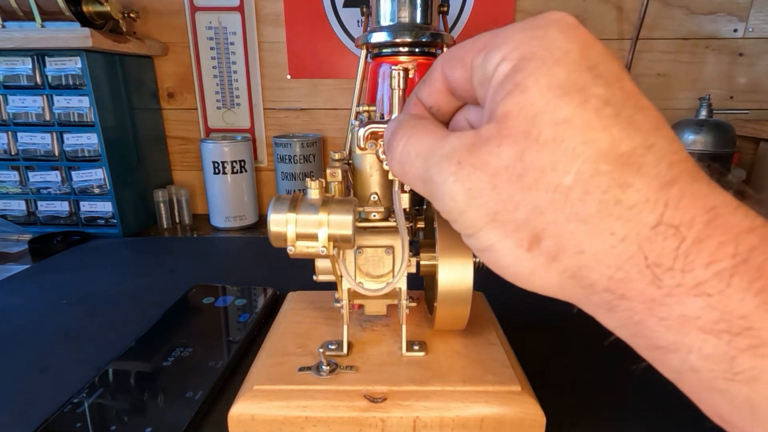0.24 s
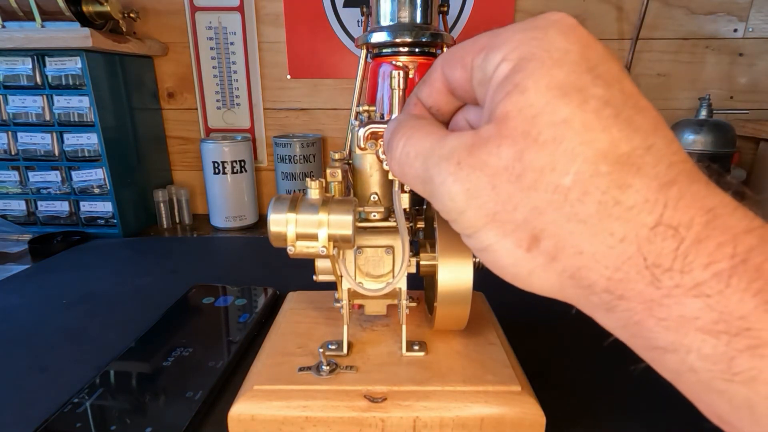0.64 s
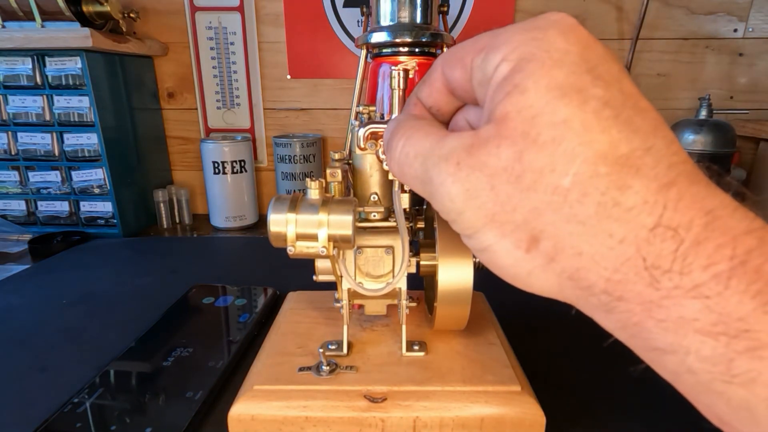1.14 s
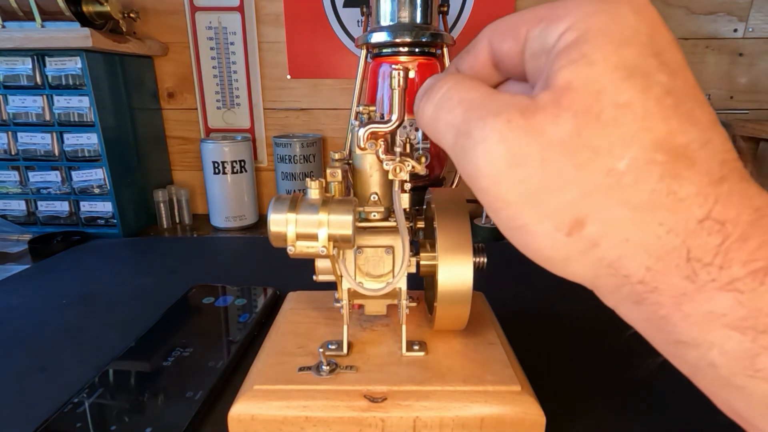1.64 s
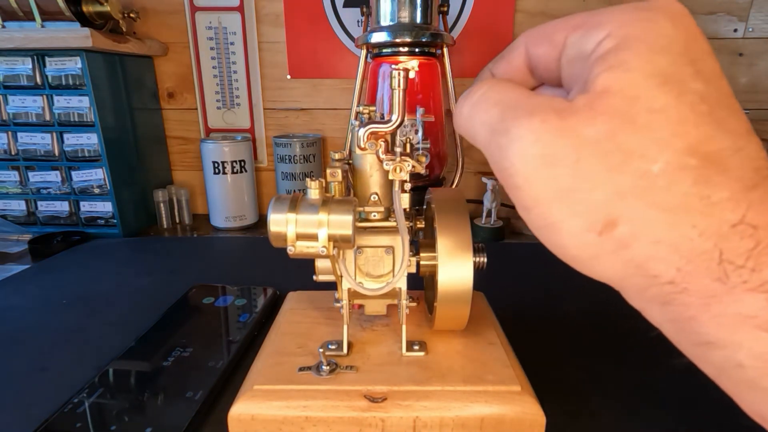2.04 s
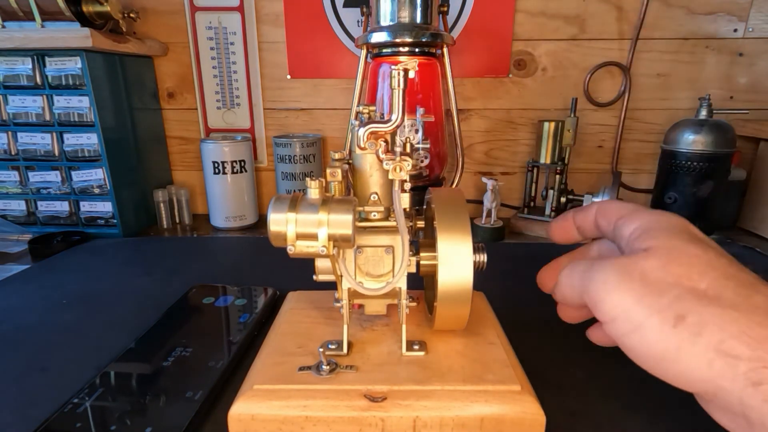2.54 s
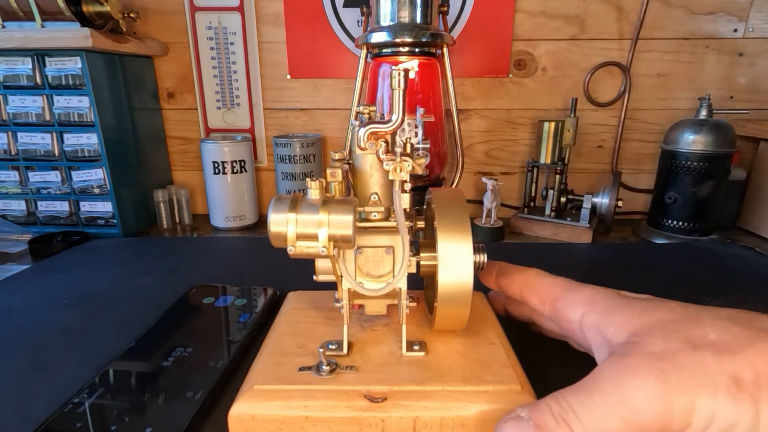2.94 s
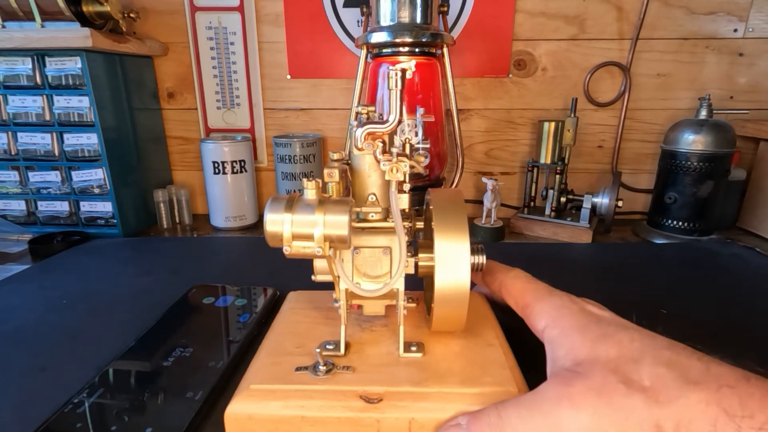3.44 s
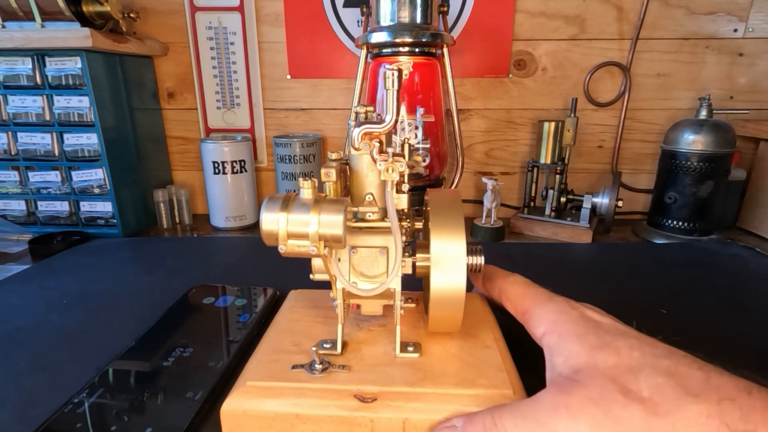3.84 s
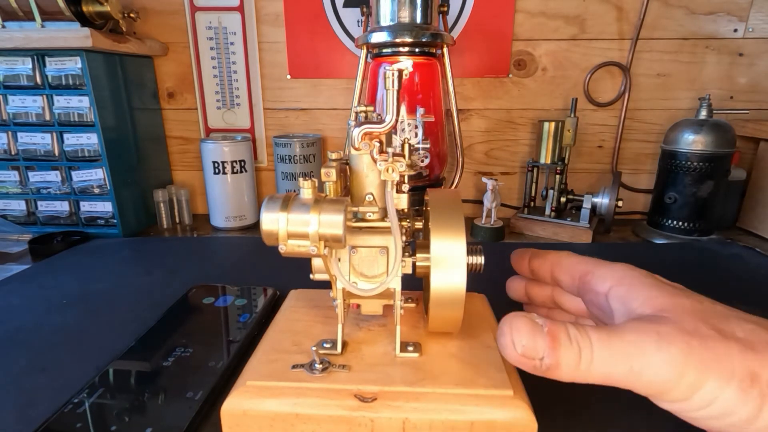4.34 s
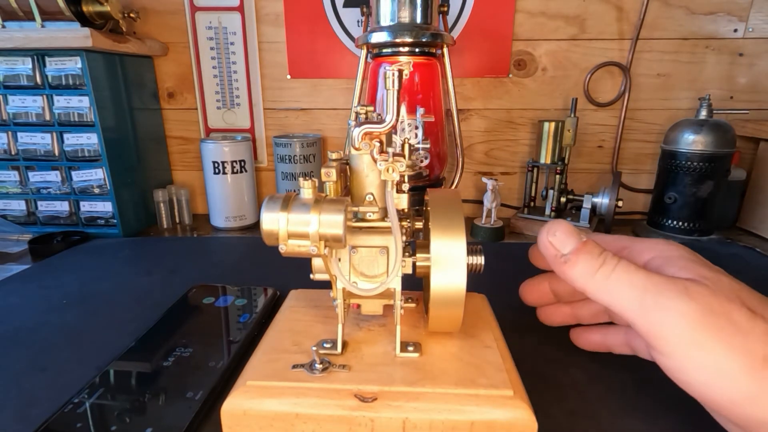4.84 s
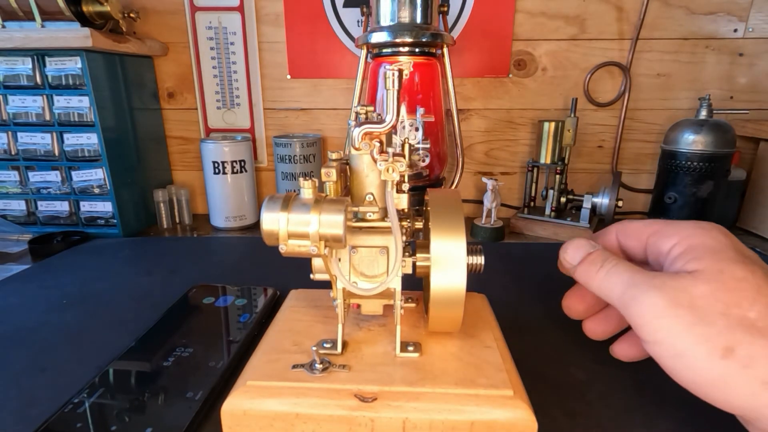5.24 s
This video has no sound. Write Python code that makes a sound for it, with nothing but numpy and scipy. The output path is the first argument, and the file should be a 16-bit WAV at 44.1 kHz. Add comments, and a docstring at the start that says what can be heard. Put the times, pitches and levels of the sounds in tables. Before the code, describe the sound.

Close up, a tiny one-cylinder engine pops rapidly for a second, then wheezes and clicks along, firing only now and then.

```python
"""Soft puffs and clinks, then sharp pops: a small hit-and-miss engine on a wooden base in a workshop.
At first it fires every other cycle: bursts of noise ring the muffler, and smooth pushes ring the pipe and
the base. Once it is up to speed the governor holds the exhaust valve open and the piston pumps air: shaped
noise hisses and roars, and a slow pressure pulse throbs with the crank. Then the latch drops (ringing
tones), the intake valve snorts (noise in quick gulps) and it pops again, close to a stereo microphone."""
import sys
import numpy as np
from scipy import signal
from scipy.fft import rfft, irfft, next_fast_len
from scipy.io import wavfile
from scipy.ndimage import uniform_filter1d, map_coordinates

SR = 44100
rng = np.random.default_rng(int(sys.argv[2]) if len(sys.argv) > 2 else 0)


def wrap_up_sound(samples):
    """Save the sound to the file named by the first command line argument, as 16-bit audio."""
    columns = np.atleast_2d(samples).T
    # keep every value between -1 and 1, then stretch to whole-number steps
    tamed = np.clip(columns, -1, 1)
    steps = np.round(tamed * 32767).astype(np.int16)
    wavfile.write(sys.argv[1], SR, steps)


def volts_from_decibels(level):
    """Turn decibel levels (scalar or array-like) into linear amplitude factors."""
    exponent = np.asarray(level, float) / 20
    return 10 ** exponent


N = 241917
TIME = np.arange(N) / SR


def unit(x):
    """Brings a sound to rms 1."""
    return x / np.sqrt(np.mean(x ** 2) + 1e-20)


def along(points, hz):
    """Reads a curve of (frequency [Hz], value) points on a log frequency axis."""
    f, v = np.transpose(points)
    return np.interp(np.log(hz + 1), np.log(f + 1), v)


def wobble(rate):
    """A smooth random curve with this many random points a second."""
    return map_coordinates(rng.standard_normal(int(N * rate / SR) + 4), [TIME * rate])


def noise():
    """Plain white noise, as long as the scene."""
    return rng.standard_normal(N)


def filtered(x, response):
    """Multiplies the spectrum of x by a complex response of frequency."""
    m = next_fast_len(N + SR // 2)
    return irfft(rfft(x, m) * response(np.fft.rfftfreq(m, 1 / SR)), m)[..., :N]


def resonances(modes):
    """Response of things that ring when struck: (frequency [Hz], width [Hz], level [dB]), signs alternating."""
    def response(f):
        total = 0
        for k, (centre, width, db) in enumerate(modes):
            damping = 1j * f * width
            total = total + (-1) ** k * volts_from_decibels(db) * damping / (centre * centre - f * f + damping)
        return total
    return response


def coloured(spectrum):
    """Noise of rms 1 with the given spectrum."""
    return unit(filtered(noise(), lambda hz: volts_from_decibels(along(spectrum, hz))))


def swells(times, dbs, rise, fall):
    """An envelope that climbs to each time and dies after it (rise and fall: seconds to change by e)."""
    total = 0
    for s, db in zip(times, dbs):
        total = total + volts_from_decibels(db) * np.exp(np.where(TIME < s, (TIME - s) / rise, (s - TIME) / fall))
    return total


def impulses(times, dbs):
    """One sample of the given level at each time."""
    return np.bincount(np.round(np.asarray(times) * SR).astype(int), volts_from_decibels(dbs), N + SR)[:N]


# noise of gears and shop air: (frequency [Hz], relative level per Hz [dB])
FLOOR = [(25, 13.5), (60, -1), (150, 0.5), (200, -7.5), (600, -27), (1000, 1.5), (2000, -69), (4000, -14),
         (8000, -44), (12000, -23), (15000, -56)]


def gears_and_air():
    """A steady noise of gears and shop air whose level drifts slowly."""
    return volts_from_decibels(-39.0 + 4.7 * wobble(8)) * coloured(FLOOR)


# dull thuds on the bench: (time [s], relative level [dB])
THUDS = [(3.847, -9.5), (4.86, -8)]


def thuds():
    """A soft knock dents the air once."""
    s, db = np.transpose(THUDS)
    dent = uniform_filter1d(swells(s + 0.0056, db + 0.5, rise=0.0018, fall=0.00021), size=50)
    return -filtered(dent, resonances([(70.0, 1100, 0.0042)]))


def openings():
    """Times at which the exhaust valve lets a charge out, as a pop or a puff."""
    return np.sort([row[0] for row in POPS + PUFFS])


USUAL_TURNS_PER_S = 13.7  # cam turns, two crank turns each
OPENING_BEFORE_S, OPENING_AFTER_S = -.057, 5.514  # openings just outside the scene
OPENS_AT_TURN, SAG_TURNS_PER_S2 = .268, 2.6  # cam angle of an opening; slowing between openings


def camshaft():
    """Cam turns: whole turns from opening to opening, fast after each and slowing steadily to the next."""
    s = np.r_[OPENING_BEFORE_S, openings(), OPENING_AFTER_S]
    whole_turns = np.round(np.diff(s) * USUAL_TURNS_PER_S)
    turns = np.r_[0, np.cumsum(whole_turns)] - 1 + OPENS_AT_TURN
    k = np.searchsorted(s, TIME)
    sag = SAG_TURNS_PER_S2 / 2 * (TIME - s[k - 1]) * (s[k] - TIME)
    return np.interp(TIME, s, turns) + sag


SHAKE_GROWS = 1.5  # power of the speed


def shake(cam):
    """How hard the moving parts shake the base: it grows with speed and is 1 at the usual speed."""
    speed = uniform_filter1d(np.gradient(cam) * SR, size=6000, mode="nearest")
    return (speed / USUAL_TURNS_PER_S) ** SHAKE_GROWS


QUIET_AFTER_POP_S, QUIET_AFTER_PUFF_S = 0.025, 0.017  # the pumping returns this long after an opening


def latch_out():
    """1 while the valve follows its cam: from each clink or tick to the next opening and a little beyond."""
    s = openings()
    spans = [(-1, s[0])]
    spans += [(row[0], s[np.searchsorted(s, row[0])]) for row in CLINKS]
    spans += [(row[0], row[0] + QUIET_AFTER_POP_S) for row in POPS]
    spans += [(row[0], row[0] + QUIET_AFTER_PUFF_S) for row in PUFFS]
    inside = np.any([(TIME > a) & (TIME < b) for a, b in spans], axis=0)
    return uniform_filter1d(1.0 * inside, size=500)


# all positions and widths in crank turns
GUSH_START, GUSH_HOLD, GUSH_FADE, LULL_DB = 0.672, 0.64, 0.22, -11  # steady flow, then a lull
SURGE_DB, SURGE_AT, SURGE_WIDTH = 6, 0.005, 0.03  # a spurt at dead centre
SURGE_WEAKER_DB = 4  # taken off the spurt on every second turn
CATCH_AT, CATCH_WIDTH, CATCH_DB = 0.09, 0.05, -5  # the flow catches just after the spurt


def gush(cam):
    """Air flow past the valve seat in dB, by crank angle."""
    since = (2 * cam - GUSH_START) % 1
    fade = np.clip((since - GUSH_HOLD) / GUSH_FADE, 0, 1)
    centre = (2 * cam + .5) % 1 - .5
    surge_db = SURGE_DB - SURGE_WEAKER_DB * (np.round(2 * cam) % 2)
    surge = surge_db * np.exp(-((centre - SURGE_AT) / SURGE_WIDTH) ** 2)
    catch = CATCH_DB * np.exp(-((centre - CATCH_AT) / CATCH_WIDTH) ** 2)
    return uniform_filter1d(LULL_DB * fade, size=60) + surge + catch


THROB_DB = -34.5  # before shaking and muting


def throb(cam, shut):
    """The piston's slow suction and short squeeze push the air at the pace of the crank."""
    turn = 2 * cam % 1
    # suction builds slowly down the stroke and lets go faster
    lag = (turn - .33 + .5) % 1 - .5
    suction = -np.exp(-(lag / np.where(lag < 0, .14, .12)) ** 2)
    squeeze = 0.4 * np.exp(-(((turn + .5) % 1 - .55) / 0.058) ** 2)  # near dead centre
    pressure = suction + squeeze
    level = volts_from_decibels(THROB_DB - 0.63 * shut + 0.3 * wobble(47))
    return shake(cam) * level * unit(pressure - pressure.mean())


# hiss whistles at the valve seat: (frequency [Hz], width of each of two passes [Hz], relative level [dB])
SEAT = [(3320, 1830, 0), (5290, 1060, 2.5), (6490, 930, -3), (7536, 840, 1.5), (9300, 3900, -4.5),
        (10690, 420, -12), (11930, 9700, -12)]
# roar of the open pipe: (frequency [Hz], width [Hz], relative level [dB])
ROAR = [(359.7, 21, -4), (551, 25, -12), (920, 163, -4), (1330, 300, -7), (1790, 315, -6.5),
        (2680, 390, -12.5)]
HISS_DB, ROAR_DB = -37.5, -37.5  # before flow and muting


def rushing_air(cam, shut):
    """Air pumped through the open valve whistles past the seat and roars in the pipe."""
    gush_db = gush(cam)
    hiss = 0
    for hz, width, db in SEAT:
        ring = resonances([(hz, width, 0)])
        whistle = unit(filtered(noise(), lambda f: ring(f) ** 2))
        hiss = hiss + volts_from_decibels(db + 0.85 * wobble(70)) * whistle  # each sputters on its own
    roar = unit(filtered(noise(), resonances(ROAR)))
    hiss_level = volts_from_decibels(HISS_DB + gush_db - 17.2 * shut + 1.2 * wobble(30))
    roar_level = volts_from_decibels(ROAR_DB + 0.35 * gush_db - 9.2 * shut + 1.3 * wobble(25))
    return hiss_level * unit(hiss) + roar_level * roar


# contacts in the cam train:
# (position [cam turns], ring [Hz], width of each of two passes [Hz], relative level [dB])
TICKS = [(-.008, 6250, 1100, 10), (-.13, 7450, 600, 2), (.38, 7450, 600, 1), (.315, 955, 150, 4),
         (0.328, 3500, 1900, 7), (.34, 10000, 3600, 1), (.345, 1550, 900, 2.5), (0.4, 5350, 1100, 3),
         (.497, 5250, 650, 7), (0.5, 470, 520, 0.5), (.012, 480, 420, 1), (.228, 430, 460, 0.5),
         (.005, 2300, 2600, 5.5)]


def cam_ticks(cam, shut):
    """Parts of the cam train touch at fixed cam angles, and each contact rings briefly."""
    turns = np.arange(1, int(cam[-1]))
    ticks = np.zeros(N)
    for part, ring_hz, width, db in TICKS:
        times = np.interp(turns + part, cam, TIME)
        blows = impulses(times, db + rng.normal(0, 0.24, len(turns)))
        ring = resonances([(ring_hz, width, 0)])
        ticks = ticks + SR / width * filtered(blows, lambda hz: ring(hz) ** 2)
    return volts_from_decibels(-41.0 - 16.0 * shut) * ticks


def coasting(cam):
    """With the exhaust valve held open the engine throbs, hisses, roars and ticks; it hushes otherwise."""
    shut = latch_out()
    return throb(cam, shut) + rushing_air(cam, shut) + cam_ticks(cam, shut)


# unburnt charge let out: (time [s], relative level [dB])
PUFFS = [(0.03, -18.5), (0.122, -18.5), (0.3, -18.5), (0.469, -17), (0.633, -18.5), (0.792, -16),
         (1.389, -13.5), (1.9816, -16), (2.129, -12), (3.37, -17.5), (3.954, -14), (4.51, -12.5),
         (5.234, -18.5)]
# air round a puff: (frequency [Hz], relative level per Hz [dB])
BREATH = [(88, 5), (150, 0), (1030, -4.5), (1460, -3.5), (2380, -14.5), (3720, -18), (4400, -16.5),
          (10400, -26), (13000, -42)]


def puffs():
    """A missed charge leaves as two soft pats inside a breath of air."""
    s, db = np.transpose(PUFFS)
    pats = swells(s + 0.00054, db + 7.0, rise=0.00019, fall=0.00035)
    pats = pats + swells(s + 0.002965, db + 3.0, rise=0.00022, fall=0.0018)
    body = filtered(pats, resonances([(407, 310, -1.74)]))
    breath = swells(s + 0.0032, db - 8.5, rise=0.0066, fall=0.0084) * coloured(BREATH)
    return body + breath


# clinks of latch and rocker, and one faint leak tick before a pop (at 5.084 s), each with a snort level:
# (time [s], relative clink or tick level [dB], relative snort level [dB])
CLINKS = [(0.0534, -28, -35.5), (0.1453, -27.5, -35.5), (0.2348, -31, -43), (0.323, -25.5, -34),
          (0.4096, -30, -39.5), (0.4929, -24, -35.5), (0.574, -29, -44), (0.6554, -23, -34),
          (0.741, -21.5, -41.5), (0.811, -17, -34), (1.3453, -28, -55), (1.4078, -21, -34.5),
          (1.975, -17, -42), (2.0019, -15, -34.5), (2.08, -17.5, -35.5), (2.522, -14, -35),
          (3.1793, -15, -34.5), (3.2488, -18, -35), (3.3293, -24.5, -49), (3.932, -18, -34.5),
          (3.972, -15.5, -33.5), (4.1913, -13.5, -34), (4.466, -15, -37), (5.0423, -14.5, -34.5),
          (5.084, -23, -39), (5.1136, -21, -35), (5.193, -29, -47)]
# steel of the latch: (frequency [Hz], relative level [dB], time to fall by 60 dB [s])
LATCH = [(1364, -7.5, 0.043), (4087, -10.5, 0.024), (6000, -3.5, 0.0034), (1300, -2.5, 0.019)]
HIGHER_AFTER_POP, LATCH_SCATTER = 1.05, 0.012  # pitch factor just behind a pop; random pitch spread


def clinks():
    """Each clink, and the leak tick, is fading steely tones with slightly unsteady phase and a short rattle."""
    out, t = np.zeros(N + SR), np.arange(SR // 10) / SR
    for s, db, _ in CLINKS:
        after_pop = any(0 < s - row[0] < .04 for row in POPS)
        pitch = (HIGHER_AFTER_POP if after_pop else 1) + LATCH_SCATTER * rng.standard_normal()
        ring = 0
        for hz, level, t60 in LATCH:
            tone_hz = hz * (pitch if hz < 2000 else 1)  # only the low rings shift
            phase = 2 * np.pi * tone_hz * t + 0.022 * np.cumsum(rng.standard_normal(len(t)))
            ring = ring + volts_from_decibels(level + rng.normal(0, 1.0) - 60 * t / t60) * np.sin(phase)
        rattle = 0.12 * volts_from_decibels(-60 * t / 0.037) * rng.standard_normal(len(t))
        attack = 1 - np.exp(-t / 0.0001)
        out[round(s * SR):][:len(t)] += volts_from_decibels(db + 4.0) * (ring + rattle) * attack
    return out[:N]


# intake passage: (frequency [Hz], width [Hz], relative level [dB])
SNORT = [(232, 76, 9), (430, 600, 5.5), (1070, 250, 10), (2110, 480, 4.5), (3590, 300, 3), (5730, 1940, -5)]
FLUTTER_HZ, FLUTTER_RISE_HZ_PER_S, FLUTTER_FADE_S = 194.4, 3000, 0.024  # bounces get faster and weaker
FIRST_GULP = 0.54  # bounce cycle at the start of a snort, whole numbers being full gulps
SUCK_DB = 8  # first pull of the intake stroke, over the snort


def snorts():
    """The intake valve bounces off its seat and lets in one noisy gulp each time, after a first pull."""
    s, _, snort_db = np.transpose(CLINKS)
    stroke = sum(volts_from_decibels(db) * np.exp(-((TIME - at - .012) / 0.011) ** 4) for at, db in zip(s, snort_db))
    last_start = s[np.maximum(np.searchsorted(s, TIME) - 1, 0)]
    since = np.clip(TIME - last_start, 0, .033)
    bounces = FLUTTER_HZ * since + FLUTTER_RISE_HZ_PER_S / 2 * since ** 2
    bounces = bounces + FIRST_GULP + .05 * wobble(60)
    gulp = np.exp(3 * np.cos(2 * np.pi * bounces)) * volts_from_decibels(2 * wobble(250))
    stroke = stroke * np.exp(.4 - since / FLUTTER_FADE_S)
    beat = unit(filtered(gulp, resonances(SNORT[:2])))
    rasp = unit(filtered(gulp ** 0.15 * noise(), resonances(SNORT[2:])))
    pull = swells(s + 0.0028, snort_db + SUCK_DB, rise=0.00092, fall=0.01)
    suck = filtered(pull, resonances([(90, 140, 0)]))
    return stroke * (beat + volts_from_decibels(-1.0) * rasp) - suck


# firings: (time [s], relative crack level [dB], relative sizzle level [dB])
POPS = [(0.213, -13, 4), (0.389, -11.5, 4.5), (0.555, -11, 4.5), (0.716, -10, 4.5), (0.868, -12, 5),
        (1.4661, -8.5, 0.5), (2.0578, -8.5, -1), (2.575, -9, 2), (3.2326, -7.5, -3.5), (3.302, -3.5, 2),
        (4.0294, -9, 1.5), (4.2425, -7, -1.5), (5.0957, -7, -1.5), (5.1648, -4.5, 5)]
# muffler bursts: (frequency [Hz], width [Hz], relative level [dB])
CRACK = [(1252, 210, 3), (1920, 330, -10.5), (3380, 680, -7.5), (4940, 520, -9.5), (6110, 470, -3.5),
         (7590, 660, -6), (10600, 2300, -12)]
# exhaust pipe: (frequency [Hz], width [Hz], relative level [dB])
PIPE = [(148, 41, -3), (242, 103, -1), (341, 56, -3.5)]
# wooden base and bench: (frequency [Hz], width [Hz], relative level [dB])
BASE = [(37.8, 14.4, -10), (49.2, 4.4, -8.5), (112, 76, -9), (141.2, 7.9, -2)]
# rocking of the base near each firing: (time before it [s], width [s], swing of pressure before shaking)
ROCK = [(0.012, 0.0048, -0.058), (0.00083, 0.0027, 0.047)]
PUSH_DB, PUSH_GROWS = 3, 0.17  # push of a charge; it grows with this power of the shaking
AFTERBLOW_DB, AFTERBLOW_S = -25, 0.013  # the rest of the gas rushing out behind a pop


def pops(cam):
    """Hot gas bursts from the muffler: a short crack on a low push that rings pipe and base."""
    s, crack_db, sizzle_db = np.transpose(POPS)
    low, high = CRACK[:2], CRACK[1:]
    onset = 1e-4  # seconds
    click = swells(s + 0.00079, crack_db + 17.0, rise=.00008, fall=.00008)
    snap = filtered(click, resonances(low))
    burst = swells(s + 0.00196, sizzle_db, rise=0.00082, fall=0.00063)
    burst = burst + swells(s + 0.0014, crack_db - 5.0, onset, fall=0.0066)
    crack = filtered(burst * noise(), resonances(high))

    # the pipe blows outward while the base recoils the other way
    def pipe_and_base(hz):
        outward = sum(resonances([mode])(hz) for mode in PIPE)
        recoil = sum(resonances([mode])(hz) for mode in BASE)
        return outward - recoil
    push = shake(cam) ** PUSH_GROWS * swells(s + .0025, PUSH_DB + 0 * s, rise=.0004, fall=.0033)
    thump = filtered(push, pipe_and_base)

    # the push rod meets the valve a moment earlier and gas starts to leak
    ended = np.clip(swells(s, 0 * s, onset, fall=0.077), 0, 1)
    leak = swells(s - .016, crack_db - 18.0, onset, fall=0.023) * (1 - ended)
    leak_modes = [(928, 49, 19), (1860, 350, 7.0), (5040, 800, -3.5)]
    leak = leak * unit(filtered(noise(), resonances(leak_modes)))

    rock = 0
    for at in s:
        for before, width, swing in ROCK:
            rock = rock + swing * np.exp(-((TIME - at + before) / width) ** 2)
    gas = unit(filtered(noise(), resonances([(266, 280, 1.0), (640, 310, -0.71)])))
    afterblow = swells(s + 0.005, AFTERBLOW_DB + 0 * s, rise=0.0023, fall=AFTERBLOW_S) * gas
    return afterblow + snap + crack + thump + leak + shake(cam) ** 2 * rock


# echo of the workshop: (frequency [Hz], time to fall by 60 dB [s])
SHOP = [(100, 0.05), (1000, 0.33), (8000, 0.36)]


def shop(x):
    """The walls answer with a tail of noise, each frequency dying at its own speed."""
    hz, t, z = signal.stft(rng.standard_normal((2, SR // 2)), SR, nperseg=256)
    fading = z * volts_from_decibels(-60 * t / along(SHOP, hz)[:, None])
    tail = signal.istft(fading, SR, nperseg=256)[1]
    late = np.pad(x, (250, 0))[None]  # samples
    return signal.fftconvolve(late, tail / np.linalg.norm(tail[0]), axes=1)[:, :N]


# balance of the two sides: (frequency [Hz], left minus right [dB])
LEFT = [(40, 1.2), (180, 1.3), (550, 1.2), (1650, -0.3), (4970, 0), (15000, -4)]
# scattered sound that differs between the sides: (frequency [Hz], share [dB])
APART = [(40, -52), (150, -32), (400, -19.5), (1000, -20), (2300, -6), (4500, -3), (8000, -16.5),
         (13000, -2)]


def two_ports(engine):
    """Sound reaches the left port 0.71 samples early; scattered sound differs from port to port."""
    side = np.array([[.5], [-.5]])

    def path(hz):
        return volts_from_decibels(side * along(LEFT, hz)) * np.exp(2j * np.pi * hz * side * 0.71 / SR)
    direct = filtered(engine, path)
    # scattering off hands, bench and casing keeps shuffling the phase
    z = signal.stft(engine, nperseg=128)[2]
    shuffled = z * np.exp(2j * np.pi * rng.random(z.shape))
    spread = signal.istft(shuffled, nperseg=128)[1][:N]
    return direct + 2 * side * filtered(spread, lambda hz: volts_from_decibels(along(APART, hz)))


def scene():
    """The engine with all its parts, heard at two ports along with the echo of the shop."""
    cam = camshaft()
    engine = gears_and_air() + thuds() + coasting(cam) + puffs() + clinks() + snorts() + pops(cam)
    return two_ports(engine) + volts_from_decibels(-19.5) * shop(engine)


GAIN_MEMORY_S, GAIN_REST_DB = 0.24, -28.5  # averaging time; level above which the gain turns down
GAIN_SHARE = 0.4  # share of a rise in dB that is taken away


def gain_control(x):
    """Loud pops pull the gain down; it creeps back as the averaged power falls."""
    keep = np.exp(-1 / (GAIN_MEMORY_S * SR))
    rest = volts_from_decibels(GAIN_REST_DB) ** 2
    power = signal.lfilter([1 - keep], [1, -keep], np.mean(x ** 2, axis=0), zi=[rest])[0]
    return x * np.maximum(power / rest, 1) ** (-GAIN_SHARE / 2)


def roll_off(x):
    """The treble ends steeply here."""
    return signal.sosfilt(signal.butter(12, 16480, fs=SR, output="sos"), x)


def record(dry):
    """The microphone rides its gain and drops the deepest bass and the top treble."""
    def microphone(hz):
        return 1j * hz / (12 + 1j * hz) / (1 + (hz / 14300) ** 18)
    mix = filtered(gain_control(dry), microphone)
    return roll_off(mix)


dry = scene()
out = record(dry)
wrap_up_sound(out)
```